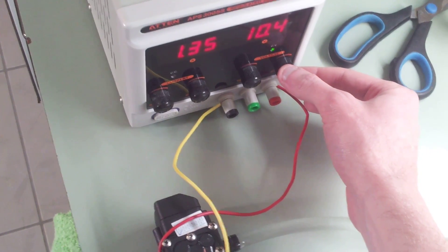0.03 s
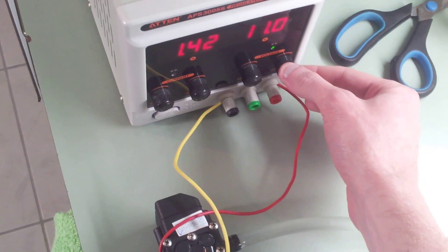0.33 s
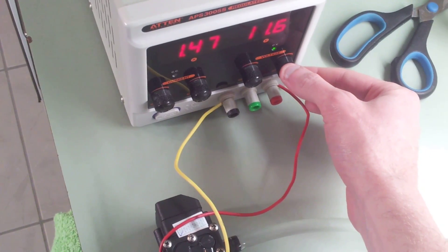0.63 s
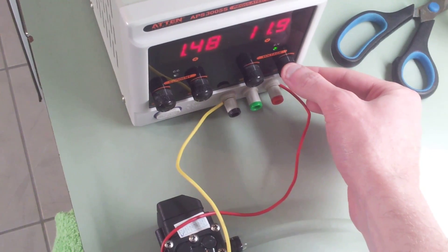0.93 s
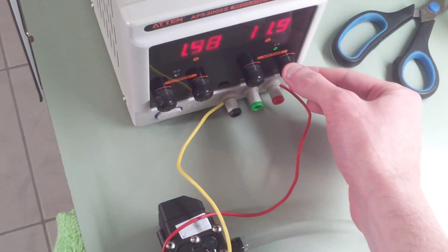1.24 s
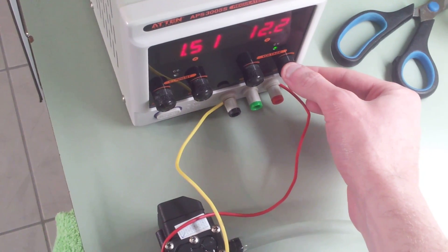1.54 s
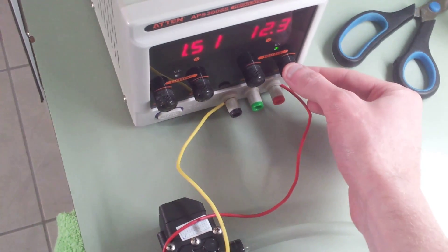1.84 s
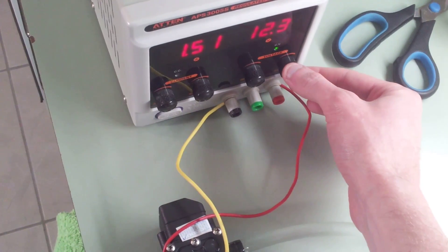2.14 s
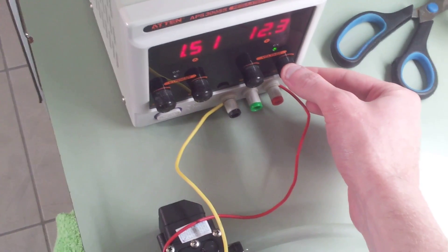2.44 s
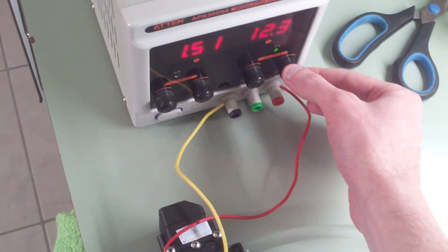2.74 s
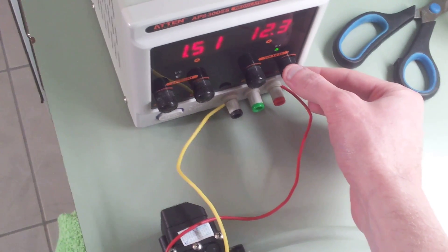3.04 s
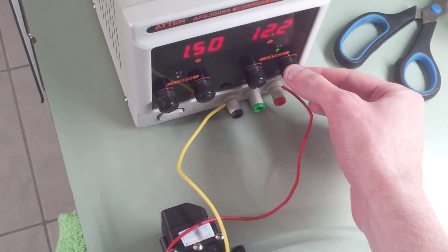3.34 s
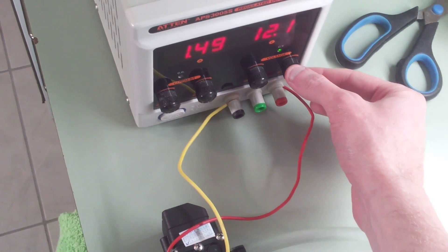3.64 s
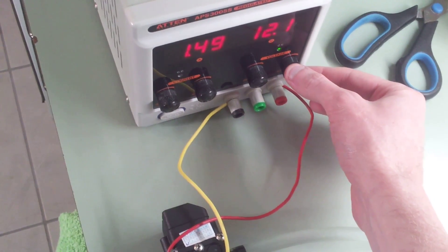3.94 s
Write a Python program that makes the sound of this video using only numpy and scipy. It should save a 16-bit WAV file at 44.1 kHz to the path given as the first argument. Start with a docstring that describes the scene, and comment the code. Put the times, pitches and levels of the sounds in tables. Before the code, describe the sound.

A small electric pump buzzes close by with a fast, rattling knock and churning hiss.

```python
"""On a workbench, a small electric pump buzzes close by, speeding up as its supply voltage is raised.
Its body rumbles on the bench, and it hums on multiples of the shaft speed under a churning hiss.
The main sound is the mechanism knocking twice a turn, a push and a pull, ringing through the housing.
Every few tenths of a second the load surges, and the knocks and the churning grow louder together."""
import sys
import numpy as np
from scipy import signal
from scipy.fft import rfft, irfft, next_fast_len
from scipy.io import wavfile

SR = 44100
rng = np.random.default_rng(int(sys.argv[2]) if len(sys.argv) > 2 else 0)


def unload_audio(sound):
    """Save the sound as a 16-bit wav file, at the path given as the first command line argument."""
    columns = np.transpose(np.atleast_2d(sound))
    # keep every value between -1 and 1, then stretch to whole-number steps
    steps = np.round(np.clip(columns, -1, 1) * 32767)
    wavfile.write(sys.argv[1], SR, steps.astype(np.int16))


N = 176400
T = np.arange(N) / SR

# how fast the shaft spins (time [s], speed [turns per s])
SHAFT_SPEED = [(0.0, 44.07), (0.1, 43.93), (0.24, 46.06), (0.4, 46.51), (0.55, 47.59), (0.72, 48.96),
               (0.9, 48.4), (1.1, 49.19), (1.26, 50.27), (1.6, 50.24), (1.75, 50.28), (1.95, 50.17),
               (2.3, 50.22), (2.75, 50.17), (3.1, 50.26), (3.3, 49.65), (3.5, 49.29), (4.0, 49.42)]
# load surges; a negative height means the load eases (start [s], hold [s], relative height [dB])
LOAD_SURGES = [(0.018, 0.064, 7), (0.24, 0.087, -2), (0.348, .04, 4), (.44, 0.036, 3), (0.525, 0.079, 3.5),
               (0.847, 0.096, 6), (0.952, 0.035, 3.5), (1.226, 0.054, 5.5), (1.444, 0.026, 3.5),
               (1.532, 0.034, 4), (1.677, 0.064, 6.5), (1.986, 0.084, 5), (2.131, 0.15, 4.5),
               (2.255, 0.049, 2), (2.385, 0.032, 5), (2.455, 0.057, 3), (2.667, 0.081, 0), (2.79, 0.049, 4),
               (2.937, 0.023, 5.5), (2.997, 0.069, 3.5), (3.213, 0.017, 6), (3.387, 0.028, 4),
               (3.637, 0.082, 3.5), (3.86, .04, 4), (3.964, .04, 4.5)]
# how long the room rings (frequency [Hz], time to fade by 60 dB [s])
ROOM_RING = [(200, 0.16), (2000, 0.2), (6000, 0.25), (14000, 0.78)]
# pitches the housing boosts or dulls (frequency [Hz], half-width [Hz], left [dB], right [dB])
HOUSING_RESONANCES = [(1830, 90, -.5, -1), (2600, 170, 1.8, 2.2), (2915, 70, 1, 1.2), (3250, 120, -1, -1),
                      (3530, 80, 3, 2.2), (3980, 110, -2, -2.5), (6100, 200, 2, 0), (6420, 120, 1.5, 1),
                      (7950, 130, .5, 3.5), (11550, 300, -1, 2)]
# tone of the rumble, the hiss and the two knocks (frequency [Hz], relative left [dB], relative right [dB])
RUMBLE_TONE = [(15, -18, -18), (55, -18, -19), (85, -5.5, -28), (129, -10.5, -11), (240, -5.5, -16),
               (290, -0.5, -3.5), (397, 3, -2), (490, -15, -8.5), (478, 2, 2.5), (574, -6, -4.5),
               (870, -7, -4.5), (1036, -5, -19), (1022, 2.5, -3.5), (1540, -29.5, -6.5), (2260, -9, -25),
               (6000, -60, -55.5)]
HISS_TONE = [(1100, -3, -2), (1700, -6, -3), (2100, -3, 2), (2600, -2, 2.5), (3100, -4, 1), (3550, -3.5, 0),
             (4000, -3.5, -2.5), (4700, -2, -3.5), (5400, 1, -4), (6150, 2.5, -3.5), (6900, 0, -2),
             (7900, -5, -3), (8800, -6, -5), (10000, -8, -6), (11600, -10, -7), (13000, -9.5, -7.5),
             (14300, -12, -11)]
PUSH_TONE = [(1100, -3, -1), (1700, -4, 1), (2100, -2, 5), (2600, 1, 7), (3100, 3, 10), (3550, 3, 8),
             (4000, 0, 2.5), (4700, -1, 0), (5400, 4.5, -1), (6150, 9, 1.5), (6900, 5, 2), (7900, -2, 2),
             (8800, -4, -1), (10000, -4, -1), (11600, -5, 3), (13000, -8, -2), (14300, -11, -7)]
PULL_TONE = [(1100, -3, 0), (1700, -6, -3), (2100, -3, 3), (2600, -1, 6), (3100, -4, 4), (3550, -2, 4),
             (4000, -4, -1.5), (4700, -2, -1), (5400, 6, .5), (6150, 10, 0), (6900, 7, 4), (7900, -1, 3),
             (8800, -2, -1), (10000, -5, -3), (11600, -7, -4), (13000, -7, -5), (14300, -11, -11)]
# the notes of the hum (multiple of shaft speed, base left [dB], base right [dB], left lead [rad])
HUM_NOTES = [(2, -55, -68, -0.6), (3, -56, -71, -0.0), (4, -48, -55, -0.5), (5, -52, -53, -0.5),
             (6, -38, -44, 0.0), (7, -51, -58, -0.4), (8, -46, -45, -0.0), (9, -50, -49, -1.3),
             (10, -41.5, -40.5, 0.3), (11, -50, -49, 0.1), (12, -45, -50, -0.4), (13, -52, -45, -0.1),
             (14, -53, -56, -0.4), (15, -50, -50, -1.1), (16, -42, -49, -0.6), (17, -56, -49, 0.1),
             (18, -48, -53, 2.7), (19, -59, -62, 2.2), (20, -54, -46, -0.2), (21, -50, -55, -0.3),
             (22, -52, -55, -0.5), (23, -53, -56, 0.2)]
# how single notes swell and fade, listed by multiple (time [s], added level [dB])
HUM_SWELLS = {2: [(0, -6), (.35, 0), (.65, 6), (1, 7), (1.6, -1.5), (2.3, -1.5), (4, 3)], 4: [(0, -1.5),
              (.6, -21), (.8, -1.5), (1.1, -1), (1.3, 1.5), (4, -1.5)], 5: [(0, -33), (.7, -23), (1.3, 0),
              (3.1, -1.5), (4, -9)], 6: [(0, -8), (.35, -2), (.7, -2.5), (.95, -1), (1.15, -1.5), (1.3, 0),
              (3.05, 0.5), (3.35, -7), (4, -4.5)], 7: [(0, 15), (.25, -2), (.5, 11.5), (.95, 2), (1.25, 0),
              (2.85, -6), (3.15, 8), (4, 8)], 8: [(0, -18), (.5, -1), (1, -7), (1.3, 1.5), (2.5, -1.5),
              (2.75, -27), (3, -0.5), (4, 1)], 9: [(0, 7.5), (.55, 6), (1.25, -7), (2.3, 3.5), (4, 1.5)],
              10: [(0, -5), (.3, -11), (.65, -9), (.9, 1), (1.45, -6), (2.4, 1.5), (3, 0.5), (3.65, -7.5),
              (4, -3)], 11: [(0, 6), (.6, 2), (1, 7), (1.35, -9), (2.4, 1), (4, 4)], 12: [(0, 8),
              (.15, -10), (.4, 0), (.7, 0), (4, 1.5)], 13: [(0, -3), (1.1, -9), (1.35, -5), (2.2, 1.5),
              (3.1, -2), (3.55, -15), (4, -15)], 15: [(0, -5), (.35, -5), (1.1, -17), (1.35, 1),
              (3.2, -0.5), (4, -8)], 16: [(0, 0), (.4, -17), (.65, -0.5), (.9, 2), (1.3, 0), (2.3, 2.5),
              (3.1, -1), (4, 4)], 18: [(0, -4), (.35, -6), (1.3, -5), (1.8, -3), (3.2, 2), (3.5, -6),
              (4, -4)], 20: [(0, -0.5), (1.1, -6), (1.3, 2), (1.7, 3), (3.1, -3), (3.45, -16), (4, -22)],
              21: [(0, -5), (.7, 3), (1.15, -8), (1.7, 1), (3.1, -0.5), (4, -4)], 22: [(0, -4), (.25, -5),
              (.7, 3), (1.7, 3), (2.4, -12), (3.2, 9.5), (3.45, -9), (4, -12)]}
# how far the notes are out of step; in step they throb once a turn (time [s], share [0-1])
HUM_SCATTER = [(0, .85), (2.7, 1), (3.3, .35), (4, .35)]


def amp(db):
    """Turns decibels into a number to multiply by."""
    return 10 ** (np.asarray(db) / 20)


def unit(x):
    """Scales a signal to an average strength (rms) of 1."""
    return x / np.sqrt(np.mean(x ** 2) + 1e-20)


def curve(points):
    """Joins (time, value) points with straight lines."""
    return np.interp(T, *np.transpose(points))


def drift(rate_hz):
    """A random wander that heads for a new value rate_hz times a second."""
    return unit(np.interp(T * rate_hz, np.arange(1000), rng.standard_normal(1000)))


def stereo_noise(shared):
    """White noise for left and right; shared (0-1) is how much they have in common."""
    noise = rng.standard_normal((3, N))
    return np.sqrt(shared) * noise[0] + np.sqrt(1 - shared) * noise[1:]


def tilt(x, treble_db, corner_hz):
    """Tips the tone like a seesaw: highs move by half of treble_db, lows by half the other way."""
    hz = np.fft.rfftfreq(N, 1 / SR)
    return irfft(rfft(x) * amp(treble_db * (0.5 - 1 / (1 + (hz / corner_hz) ** 10))), N)


def pump_load(speed):
    """Effort in dB around its average: it drops a little with speed; each surge rises, holds and ebbs."""
    rise_s, fall_s = .023, .09
    db = -.11 * speed
    for start, hold, height in LOAD_SURGES:
        rise = np.clip((T - start) / rise_s, 0, 1)
        fall = np.exp(-np.maximum(T - start - hold, 0) / fall_s)
        db += height * rise * fall
    return db - db.mean()


def housing_ring(x, tone, low_cut_hz):
    """Shapes a sound with a tone table and the housing's resonances, and cuts away the lows."""
    size = 4096
    hz = np.abs(np.fft.fftfreq(size, 1 / SR)) + 1
    tone_hz, *sides = np.transpose(tone)
    db = np.array([np.interp(np.log(hz), np.log(tone_hz), side) for side in sides])
    for centre, width, *lift in HOUSING_RESONANCES:
        db += np.outer(lift, 1 / (1 + ((hz - centre) / width) ** 2))
    gain = amp(db) / (1 + (low_cut_hz / hz) ** 4)
    # minimum phase: the ringing comes after a hit, never before it
    response = np.exp(signal.hilbert(np.log(gain + 1e-5)).conj())
    ring = np.fft.ifft(response).real[:, :size // 2]
    return signal.oaconvolve(np.atleast_2d(x), ring, axes=1)[:, :N]


def housing_smear(x, spread_s):
    """The housing delays each pitch by its own tiny amount, differently on each side, the highs most."""
    size = next_fast_len(N + SR // 10)
    hz = np.fft.rfftfreq(size, 1 / SR)
    band_hz = np.arange(0, SR / 2, 550)
    delays = spread_s * rng.exponential(1, (2, len(band_hz))) * (.5 + (band_hz / 8500) ** 2)
    phase = np.cumsum([np.interp(hz, band_hz, side) for side in delays], axis=1) * 2 * np.pi * hz[1]
    return irfft(rfft(x, size) * np.exp(-1j * phase), size)[:, :N]


def echoes(x):
    """Quick echoes off the bench and the power supply's case, then the short ring of the room."""
    bench_db, room_db, bench_ring_s = -8, -9.5, .022
    t = T[:SR // 2]
    bench, room = rng.standard_normal((2, 2, len(t)))
    bench *= (t > .0009) * amp(-60 * t / bench_ring_s)
    hz, when, bands = signal.stft(room * (t > .006), SR, nperseg=256)
    ring_s = np.interp(hz, *np.transpose(ROOM_RING))[:, None]
    room = signal.istft(bands * amp(-60 * when / ring_s), SR)[1][:, :len(t)]
    tail = sum(amp(db) * part / np.linalg.norm(part, axis=1, keepdims=True)
               for db, part in [(bench_db, bench), (room_db, room)])
    return signal.oaconvolve(x, tail, axes=1)[:, :N]


def churn(turn, surge_db, pulse, fade_turns, rebound, shared):
    """Swirling noise that jumps at each stroke, falls back, and lifts again as the knock rebounds."""
    rebound_turns, width_turns = (.265, .715), .02
    strokes = np.exp(-(turn % .5) / fade_turns)
    bounces = sum(np.exp(-((turn % 1 - at) / width_turns) ** 2) for at in rebound_turns)
    return stereo_noise(shared) * (1 + pulse * strokes + rebound * bounces) * amp(surge_db)


def body_rumble(turn, load_db):
    """The pump's body rumbles on the bench, pulsing with each stroke."""
    noise = churn(turn, 1.3 * load_db, pulse=.73, fade_turns=.11, rebound=.14, shared=.52)
    return amp(-38.8) * unit(housing_ring(noise, RUMBLE_TONE, low_cut_hz=13))


def shaft_hum(turn, load_db):
    """Wavering notes on multiples of the shaft speed; the higher ones flutter more."""
    throb_turn, waver_db, waver_rad, flutter_per_khz = .04, 1.0, .15, .3
    hum = np.zeros((2, N))
    for multiple, left_db, right_db, lead in HUM_NOTES:
        scatter = (rng.random() - .5) * curve(HUM_SCATTER)
        phase = 2 * np.pi * (multiple * (turn - throb_turn) + scatter) + waver_rad * drift(14)
        swell_db = curve(HUM_SWELLS[multiple]) if multiple in HUM_SWELLS else 0
        change_db = -.3 + .3 * load_db + waver_db * drift(9) + swell_db
        depth = flutter_per_khz * multiple * curve(SHAFT_SPEED) / 1000
        flutter = (1 + depth * (drift(40) + 1j * drift(40))) / np.sqrt(1 + 2 * depth ** 2)
        note = np.sqrt(2) * amp(change_db) * flutter * np.exp(1j * phase)
        hum += np.outer([amp(left_db) * np.exp(1j * lead), amp(right_db)], note).real
    return hum


def churning_hiss(turn, load_db):
    """The swirling flow hisses through the housing, louder as the load grows."""
    noise = churn(turn, .76 * load_db, pulse=.45, fade_turns=.1, rebound=.48, shared=.26)
    hiss = amp(-27) * unit(housing_ring(noise, HISS_TONE, low_cut_hz=990))
    return tilt(hiss, treble_db=1.5, corner_hz=9800)


def knock(turn, surge_db, tone, spread_s, low_cut_hz):
    """One sharp hit per turn, with a brief gritty scrape, ringing through the housing."""
    jitter_s, uneven_db, scrape_s, scrape_gain = .00003, .5, .0009, .55
    times = np.interp(np.arange(1, turn[-1]), turn, T)
    lateness, strength = rng.standard_normal((len(times), 2)).T
    at = np.clip(np.round((times + jitter_s * lateness) * SR).astype(int), 0, N - 1)
    hits = np.zeros(N)
    hits[at] = amp(surge_db[at] + uneven_db * strength)
    fade = np.exp(-1 / (scrape_s * SR))
    scrape = signal.lfilter([np.sqrt(1 - fade ** 2)], [1, -fade], hits) * stereo_noise(shared=.4)
    impact = housing_smear(hits, spread_s) + scrape_gain * scrape
    return unit(housing_ring(impact, tone, low_cut_hz))


def mechanism_knocks(turn, load_db):
    """The mechanism knocks on the push and again, half a turn later, on the pull."""
    push = knock(turn, .65 * load_db, PUSH_TONE, spread_s=.0003, low_cut_hz=1270)
    pull = knock(turn + .5, .9 * load_db, PULL_TONE, spread_s=.0004, low_cut_hz=1300)
    push = tilt(amp(-30.6) * push, treble_db=-1, corner_hz=7100)
    pull = tilt(amp(-32.9) * pull, treble_db=-8, corner_hz=7250)
    return push + pull


def scene():
    """One shaft and its load drive every layer; only the knocks get echoes."""
    speed = curve(SHAFT_SPEED)
    turn = .089 + np.cumsum(speed) / SR  # shaft position, counted in turns
    load_db = pump_load(speed)
    knocks = mechanism_knocks(turn, load_db)
    hiss = churning_hiss(turn, load_db)
    rumble = body_rumble(turn, load_db)
    return echoes(knocks) + rumble + shaft_hum(turn, load_db) + hiss + knocks


def record(dry):
    """Cuts off the very highest treble."""
    cutoff_hz = 14480
    low_pass = signal.firwin(601, cutoff_hz, window=("kaiser", 8), fs=SR)
    return signal.oaconvolve(dry, low_pass[None], "same")


dry = scene()
out = record(dry)
unload_audio(out)
```